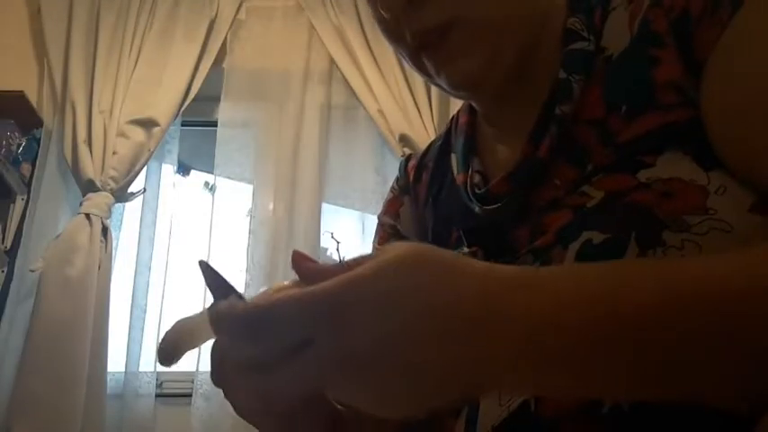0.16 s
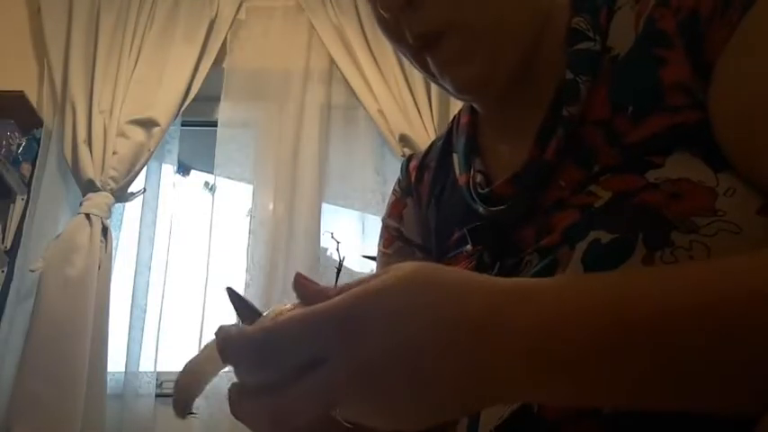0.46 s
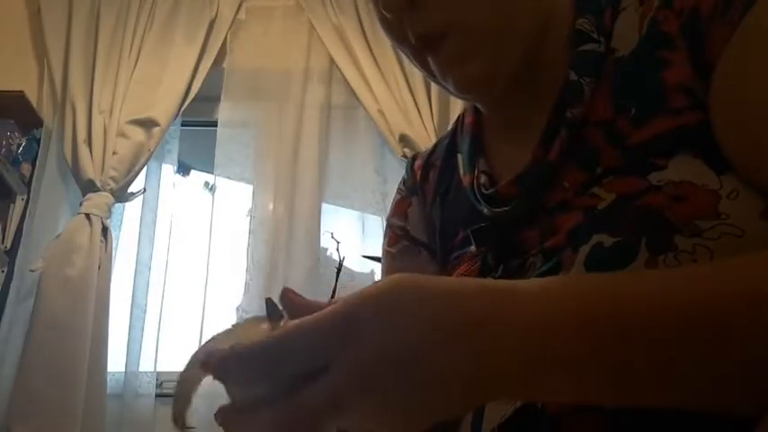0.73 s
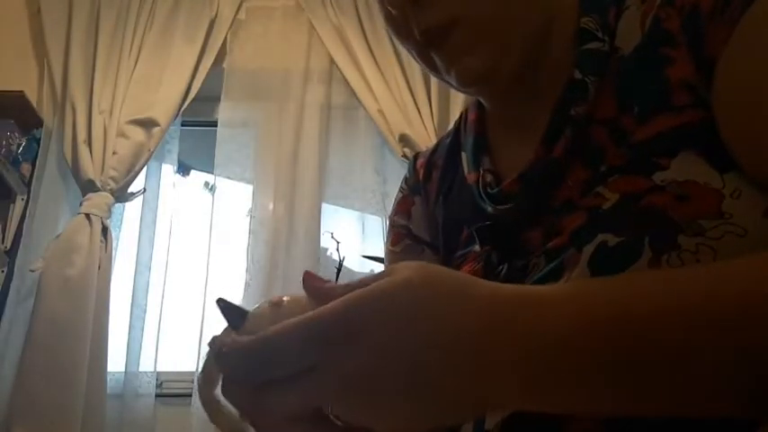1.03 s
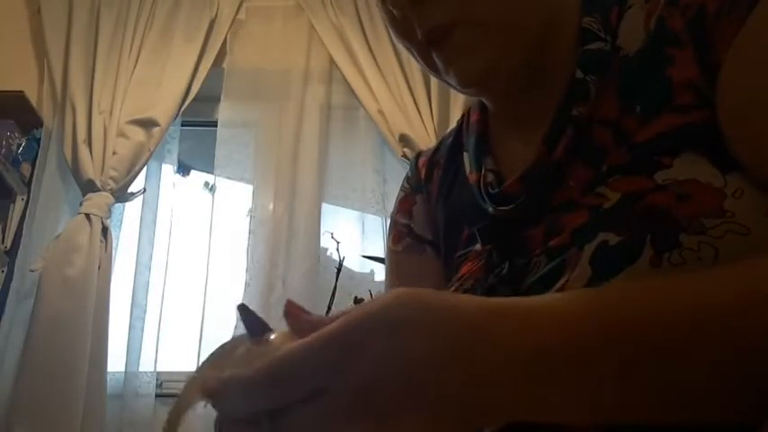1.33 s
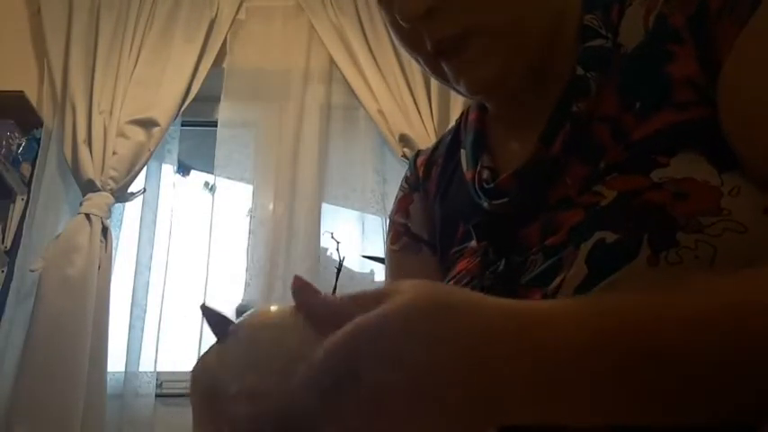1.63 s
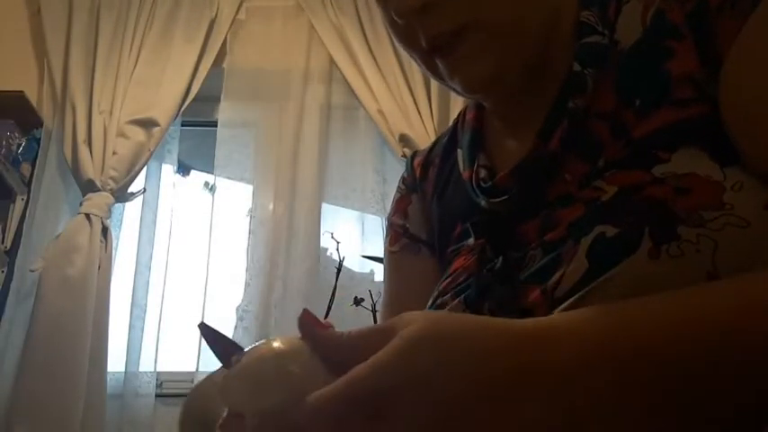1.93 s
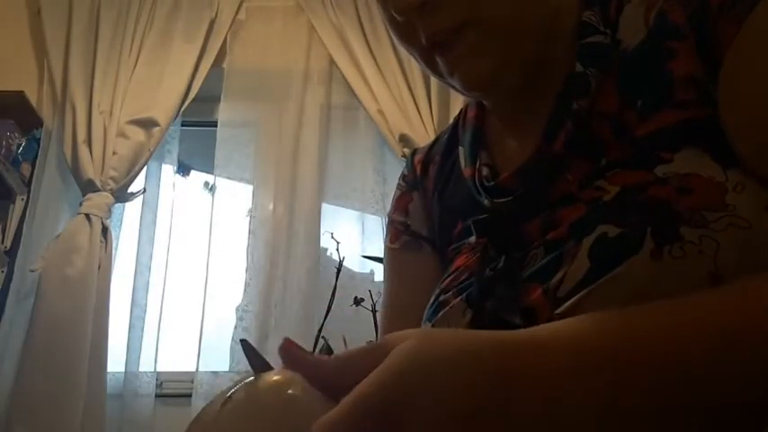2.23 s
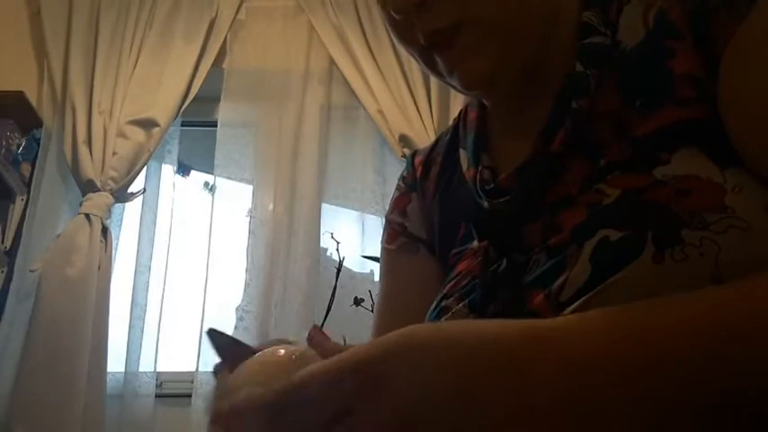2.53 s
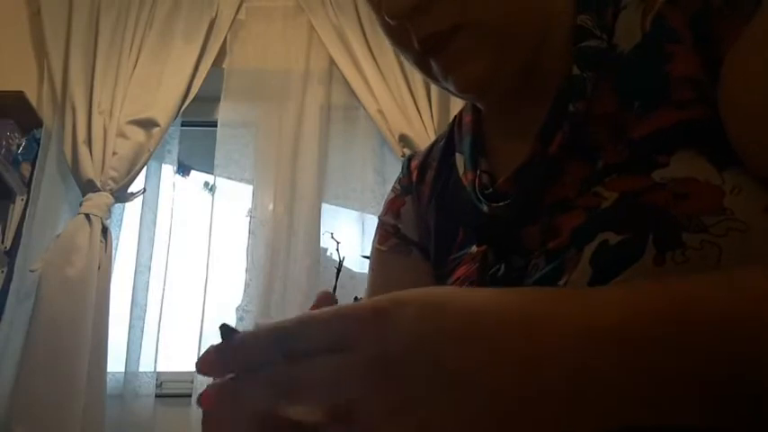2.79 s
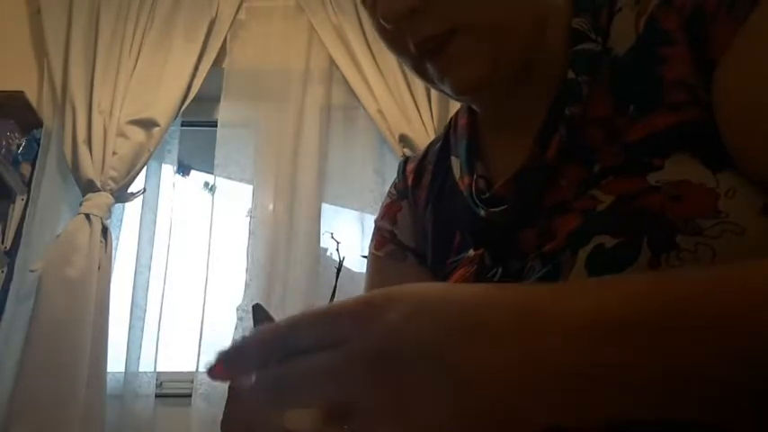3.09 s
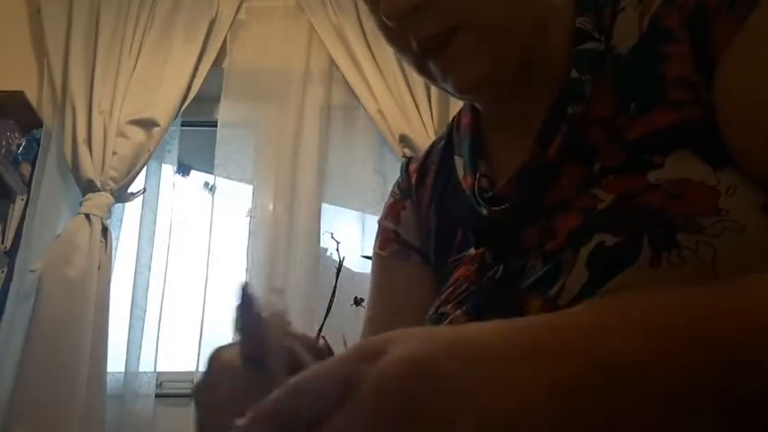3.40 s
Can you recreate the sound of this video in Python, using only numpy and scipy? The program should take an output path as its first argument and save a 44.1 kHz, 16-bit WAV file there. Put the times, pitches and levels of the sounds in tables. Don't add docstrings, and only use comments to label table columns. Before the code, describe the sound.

Papery onion skin tears in several bursts, rests, swells again, a blade taps the counter once, and a long final tear stops abruptly; close, bright sound in a small quiet kitchen.

```python
import sys
import numpy as np
from scipy import signal
from scipy.fft import rfft, irfft
from scipy.io import wavfile
from scipy.ndimage import uniform_filter1d

SR = 44100
rng = np.random.default_rng(int(sys.argv[2]) if len(sys.argv) > 2 else 0)


def dump_mix(stems):
    frames = np.atleast_2d(stems).T
    limited = np.clip(frames, -1, 1)
    pcm = np.round(limited * 32767).astype(np.int16)
    wavfile.write(sys.argv[1], SR, pcm)


def volts_from_db(level):
    exponent = np.asarray(level, float) / 20
    return 10 ** exponent


N = 156555

# [f/Hz, level/dB per Hz]
ROOM_AIR = [(25, -15), (160, -4.5), (485, -9.5), (760, -24.5), (1440, -28), (5840, -36.5), (8400, -49),
            (14000, -83)]
# [f/Hz, width/Hz, level/dB]
HUM_MODES = [(93.6, 5.3, -56.5), (138.6, 16.7, -53.5), (268, 71, -59.5), (517.6, 11, -74),
             (1530, 170, -75.5)]
# [f/Hz, width/Hz, level/dB]
PORT_PEAKS = [(8270, 2140, 17.5), (9170, 2260, 6), (4940, 4500, 2.5), (14600, 1800, 3.5), (6400, 3700, 2.5)]
# [t/s, level/dB]
PULL_LEVELS = [
    [(0, -58.5), (.13, -53.5), (.26, -52), (.305, -44), (.315, -40), (.47, -35), (.49, -39.5), (.51, -32),
     (.6, -40)],
    [(.62, -37), (.66, -32), (.7, -28.5), (.73, -32.5), (.75, -43.5), (.79, -57.5), (.93, -58.5),
     (.95, -54), (1.11, -48)],
    [(1.135, -28), (1.165, -36.5), (1.21, -32.5), (1.245, -23.5), (1.28, -33.5), (1.32, -35.5),
     (1.335, -28), (1.44, -35.5), (1.48, -53.5)],
    [(1.74, -60.5), (1.78, -56), (1.89, -44.5), (1.91, -43), (2.06, -29), (2.13, -38), (2.18, -39),
     (2.235, -33), (2.27, -48)],
    [(2.32, -53), (2.345, -41.5), (2.375, -29), (2.41, -49), (2.445, -54), (2.46, -38.5), (2.58, -58),
     (2.745, -65.5), (2.756, -31)],
    [(2.8, -53.5), (2.87, -55.5), (2.94, -44), (3.08, -47), (3.1, -34.5), (3.2, -28.5), (3.25, -30),
     (3.28, -37), (3.39, -34)],
    [(3.42, -56.5), (3.47, -62), (3.55, -73)],
]
# [t/s, level/dB]
CRACKLE_BODY = [(0, -15), (.4, -9.5), (.65, -5.5), (1, -8), (1.25, -18.5), (1.4, -7.5), (1.7, -8),
                (2.05, -9.5), (2.22, -15), (2.38, -8), (2.75, -17.5), (2.95, -5.5), (3.2, -14),
                (3.39, -5.5)]
# [t/s, level/dB]
BLADE_SHEEN = [(0, -46), (.7, -10), (1.2, -15), (1.4, -16), (2.1, -17), (2.75, -32), (3.1, -31),
               (3.22, -8.5), (3.35, -7.5), (3.42, -19)]
# [t/s, peak level/dB, hollow against it/dB, hollow f/Hz, bulb against it/dB]
LOUD_SNAPS = [(0.3105, -13.5, -39, 2700, -28), (0.3332, -20.5, -13.5, 3110, -36),
              (0.3511, -15, -21, 3220, -35), (0.3712, -15.5, -20, 3710, -46),
              (0.388, -19.5, -17, 3130, -38), (0.406, -16.5, -24, 2750, -35), (0.412, -24, -16, 2670, -26),
              (0.432, -18.5, -12, 2940, -30), (0.4432, -14.5, -8, 3320, -25),
              (0.5044, -17, -23, 2410, -39), (0.5268, -16.5, -17, 3560, -23),
              (0.5411, -20, -10.5, 2600, -31), (0.5671, -17.5, -17, 3620, -29),
              (0.5726, -24, -9.5, 2310, -19.5), (0.5908, -30, -11, 2440, -32),
              (0.6068, -15, -23, 3230, -31), (0.616, -15.5, -5, 2940, -21.5),
              (0.6444, -27, -13, 3010, -12), (0.6556, -12.5, -20, 2800, -29),
              (0.6837, -10.5, -17, 2640, -27), (0.6911, -24, -13, 2900, -27),
              (0.7032, -11.5, -12, 2720, -35), (0.7188, -16, -10.5, 2780, -44),
              (1.1156, -23.5, -13.5, 3300, -34.5), (1.1346, -18, -10.5, 2490, -21.5),
              (1.1563, -27.5, -0.5, 4000, -16), (1.1807, -18, -15.5, 2810, -33),
              (1.2173, -14, -12, 2520, -37), (1.2254, -13, -7.5, 2800, -23), (1.2375, -15, -26, 4260, -31),
              (1.2416, -14, -11.5, 2410, -38), (1.2577, -15, -22, 3970, -41), (1.264, -15, -23, 2940, -45),
              (1.2777, -14.5, -20, 2790, -40), (1.297, -17.5, -17, 2750, -45),
              (1.3286, -17, -8, 3800, -26.5), (1.3547, -8, -9, 3600, -37.5), (1.3658, -11, -21, 2900, -37),
              (1.3947, -22, -30, 2800, -26.5), (1.4521, -23, -23, 3950, -22.5),
              (1.8883, -38, -14, 3220, -23), (1.9045, -17.5, -14.5, 3150, -27.5),
               (1.95, -20, -13.5, 4270, -32), (1.9641, -17, -15, 3070, -29), (2.0016, -15, -20, 2900, -38),
               (2.0231, -19.5, -15, 2760, -31), (2.0425, -21.5, -7.5, 3020, -36),
               (2.0588, -19.5, -12, 2970, -35), (2.0731, -15, -13, 3020, -30),
               (2.145, -23.5, -37, 2900, -41), (2.1828, -14, -20, 3080, -33), (2.1954, -19, -15, 2930, -30),
               (2.2225, -12.5, -29, 4360, -43), (2.3278, -19.5, -19, 4200, -32.5),
               (2.3585, -23, -7.5, 4100, -43), (2.374, -15, -16, 3930, -41), (2.3847, -21, -23, 4220, -41),
               (2.4521, -12.5, -18.5, 3900, -30.5), (3.042, -20, -21, 3810, -35),
               (3.0703, -29, -29, 2550, -46), (3.085, -24, -8.5, 4010, -30), (3.0895, -20, -8, 3200, -39),
               (3.1059, -17, -25, 2880, -27.5), (3.1117, -20.5, -17, 3020, -38),
               (3.1274, -16, -29, 3020, -41), (3.135, -22, -20, 2880, -47), (3.1506, -15.5, -27, 3810, -42),
               (3.1685, -10.5, -34, 2860, -47), (3.1817, -10, -24, 2700, -32),
               (3.1958, -14.5, -20, 3120, -33), (3.2136, -16.5, -15.5, 3130, -29),
               (3.2359, -7, -40, 4470, -51), (3.2437, -15, -29, 4600, -46), (3.2644, -19, -13.5, 2770, -36),
               (3.2994, -24.5, -12, 2610, -19), (3.3467, -15.5, -44, 3190, -28)]
# [t/s, peak level/dB]
FAINT_TICKS = [(0.0355, -30), (0.1037, -39), (0.1446, -25.5), (0.181, -42), (0.839, -39), (0.8615, -41),
               (0.9044, -38), (0.9395, -26), (0.952, -28), (1.009, -33), (1.022, -29.5), (1.072, -29),
               (1.556, -33), (1.761, -30), (1.7937, -33.5), (1.8507, -35), (2.23, -16.5), (2.284, -34),
               (2.4964, -44), (2.5258, -34), (2.546, -29), (2.6354, -56), (2.6454, -52), (2.67, -46),
               (2.6812, -38), (2.775, -25), (2.789, -27), (2.8096, -34), (2.834, -30), (2.8742, -30.5),
               (2.885, -33), (2.9346, -29.5), (2.9946, -36), (3.018, -28)]
# [t/s, level/dB]
BLADE_CONTACTS = [
    (-.001, -12),
    (.0007, 0),
    (.0038, -16),
    (.007, -16),
    (.013, -19),
    (.0255, -23),
]
# [f/Hz, level/dB, t60/s]
COUNTER_MODES = [(950, 1, .042), (1690, -15, .04), (740, -16, .04), (2150, -18, .03), (170, -1, .07),
                 (3340, -18, .03)]

SKIN_CYCLES = 10.9
FLESH_HZ = 1180
BRIGHT_CUT_HZ, BASS_CUT_HZ = 3200, 51.4


def rms_one(x):
    return x / np.sqrt(np.mean(x ** 2) + 1e-20)


def top_one(x):
    return x / np.abs(x).max(axis=-1, keepdims=True)


def breakpoints(table):
    return np.interp(np.arange(N) / SR, *np.transpose(table))


def drift(rate_hz):
    r = np.exp(-2 * np.pi * rate_hz / SR)
    wander = signal.lfilter([1], [1, -2 * r, r * r], rng.standard_normal(N + SR))
    return rms_one(wander[SR:])


def ring(x, hz, t60):
    r, w = volts_from_db(-60 / (t60 * SR)), 2 * np.pi * hz / SR
    return signal.lfilter([0, np.sin(w)], [1, -2 * r * np.cos(w), r * r], x + 1e-18)


def cut(x, hz, kind, order=2):
    return signal.sosfilt(signal.butter(order, hz, kind, fs=SR, output="sos"), x)


def port(x):
    for hz, width_hz, db in PORT_PEAKS:
        a, k = volts_from_db(db / 2), np.tan(np.pi * width_hz / SR)
        c = -2 * np.cos(2 * np.pi * hz / SR)
        x = signal.lfilter([1 + k * a, c, 1 - k * a], [1 + k / a, c, 1 - k / a], x)
    return cut(x, 13130, "low", order=4)


def room_noise():
    hz, db = np.transpose(ROOM_AIR)
    f = np.fft.rfftfreq(N, 1 / SR) + 1
    colour = volts_from_db(np.interp(np.log(f), np.log(hz), db))
    noise = volts_from_db(-58) * rms_one(irfft(rfft(rng.standard_normal(N)) * colour, N))
    for hz, width_hz, db in HUM_MODES:
        mode = ring(rng.standard_normal(N + SR), hz, 2.46 / width_hz)[SR:]
        noise = noise + volts_from_db(db + 2 * drift(1.22)) * rms_one(mode)
    return noise


def skin(breaks, dealt):
    peak_hz, slope_db = 3020, 5
    hollows = 0
    for k, hz in enumerate(np.geomspace(2590, 4790, num=12)):
        level_db = -slope_db * abs(np.log2(hz / peak_hz))
        hollows = hollows + volts_from_db(level_db) * ring(breaks * (dealt == k), hz, SKIN_CYCLES / hz)
    bulb = cut(ring(breaks, FLESH_HZ, 0.0054), 400, "high")
    return cut(hollows, 1900, "high", order=4) + volts_from_db(-13.5) * bulb


def crackle():
    grains_per_s, spread_db = 5000, 2.2
    level_db = breakpoints(np.concatenate(PULL_LEVELS))
    clump_db = 1.2 * drift(120)
    sparse_db = 0.4 * np.minimum(level_db + 35.5, 0)
    born = rng.random(N) < grains_per_s * volts_from_db(clump_db + sparse_db) / SR
    size_db = spread_db * np.minimum(rng.exponential(1, N), 4)
    grains = born * volts_from_db(size_db + 1.6 * clump_db - sparse_db / 2) * rng.choice([-1, 1], N)
    dealt = np.resize(rng.integers(0, 12, N // 150 + 1), N)
    bright = rms_one(port(cut(grains, BRIGHT_CUT_HZ, "high")))
    body = volts_from_db(breakpoints(CRACKLE_BODY) - 3) * rms_one(port(skin(grains, dealt)))
    sheen_hz, sheen_t60 = 6070, .0025
    slide = ring(ring(grains, sheen_hz, sheen_t60), sheen_hz, sheen_t60)
    sheen = volts_from_db(breakpoints(BLADE_SHEEN)) * rms_one(slide)
    return volts_from_db(level_db + 0.4) * (bright + body + sheen)


def kitchen(x):
    t60, level_db = .2, -15
    t = np.arange(SR // 2) / SR
    answer = rng.standard_normal(len(t)) * volts_from_db(-60 * t / t60) * (t > .002)
    return volts_from_db(level_db) * signal.fftconvolve(x, answer / np.sqrt(np.sum(answer ** 2)))[:N]


def snaps():
    ticks = [(s, db, -27, 3100, -38) for s, db in FAINT_TICKS]
    rows = [*LOUD_SNAPS, *ticks]
    t = np.arange(1024) / SR
    t60 = np.repeat([.011, .017], [len(rows) - len(ticks), len(ticks)])[:, None]
    run = np.clip(rng.standard_normal((len(rows), len(t))) ** 3, -6, 6) * volts_from_db(-4.5 - 60 * t / t60)
    run[:, 0] = 4.26
    bright = port(cut(run, BRIGHT_CUT_HZ, "high"))
    bright[-len(ticks):] = cut(bright[-len(ticks):], 4000, "high")
    thuds = top_one(cut(ring(run, FLESH_HZ, 0.0051), 430, "high"))
    out = np.zeros(N + SR)
    for (s, db, body_db, hz, thud_db), burst, crack, thud in zip(rows, run, top_one(bright), thuds):
        hollow = top_one(cut(ring(burst, hz, 7 / hz), 2250, "high", order=4))
        rasp = top_one(cut(ring(burst, 2 * hz, SKIN_CYCLES / hz / 2), 1140, "high", order=4))
        sound = crack + volts_from_db(-17) * rasp + volts_from_db(body_db + 4) * hollow + volts_from_db(thud_db + 4) * thud
        start = int(s * SR)
        out[start:start + len(t)] += volts_from_db(db - 1.5) * sound
    return out[:N]


def whirr():
    centre_s, length_s, t60 = 1.415, 0.2, 0.0093
    swell = np.exp(-((np.arange(N) / SR - centre_s) / length_s) ** 2)
    low, high = (rms_one(ring(ring(rng.standard_normal(N), hz, t60), hz, t60)) for hz in (1506, 1970))
    return volts_from_db(-61) * swell * (low + volts_from_db(-8) * high)


def knock():
    knock_s, steel_hz, steel_t60 = 2.752, 8640, .0042
    click, touches = np.zeros(N), np.zeros(N)
    click[int(knock_s * SR)] = volts_from_db(-30.5)
    for s, db in BLADE_CONTACTS:
        touches[int((knock_s + s) * SR)] = volts_from_db(db)
    steel = top_one(ring(ring(touches, steel_hz, steel_t60 / 2), steel_hz, steel_t60))
    crack = volts_from_db(-4) * port(cut(touches, 7500, "high"))
    board = sum(volts_from_db(db) * ring(click, hz, t60) for hz, db, t60 in COUNTER_MODES)
    return volts_from_db(-5) * (steel + crack) + cut(board, 2 * BASS_CUT_HZ, "high")


def scene():
    hands = crackle() + snaps() + knock()
    room = cut(room_noise(), BASS_CUT_HZ, "high", order=4)
    mid = hands + kitchen(hands) + room + whirr()
    return np.array([mid, mid])


def band_limit(x):
    return signal.sosfilt(signal.butter(12, 15760, fs=SR, output="sos"), x)


def record(dry):
    hz, _, z = signal.stft(dry[0], SR, nperseg=1024)
    khz = hz[:, None] / 1000
    power = uniform_filter1d(np.abs(z) ** 2, size=15, axis=0)
    gate_db = -94 + 8.5 * (khz - 12)
    z = z * (10 * np.log10(power + 1e-30) > gate_db)
    quiet = 10 * np.log10(power[70:].sum(axis=0) + 1e-30) < -49
    patches = np.kron(rng.random((22, z.shape[1] // 3 + 1)), np.ones((24, 3)))
    patches = patches[:len(hz), :z.shape[1]]
    apart = (patches < np.where(quiet, 0.39, .1)) * (khz > 0.7)
    phase = np.exp(2j * np.pi * rng.random(z.shape))
    side_level = volts_from_db(-13 + 1.3 * (khz - 9.5)) * np.sqrt(power)
    difference = side_level * apart * phase * (z != 0)
    mid, side = (signal.istft(v, SR, nperseg=1024)[1][:N] for v in (z, difference))
    mix = np.array([mid + side, mid - side]) - 0.001
    return band_limit(mix)


dry = scene()
out = record(dry)
dump_mix(out)
```